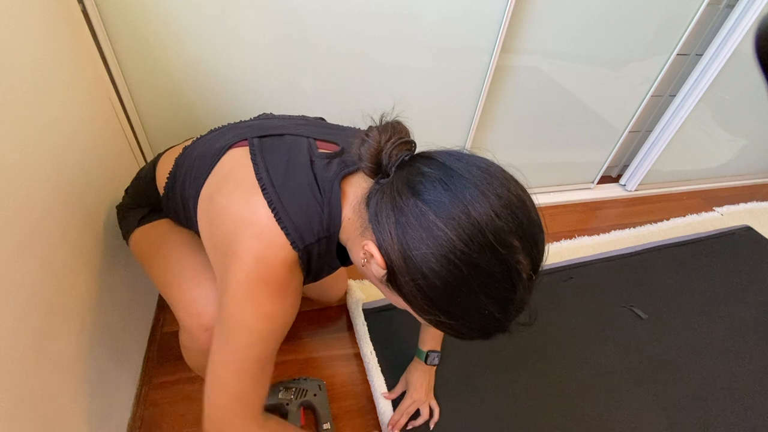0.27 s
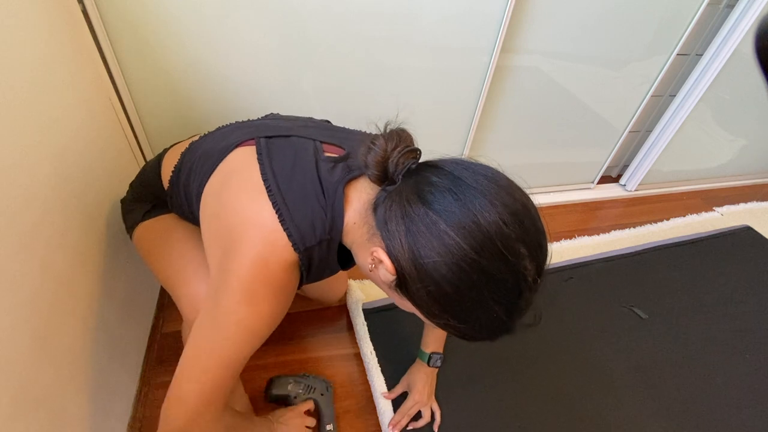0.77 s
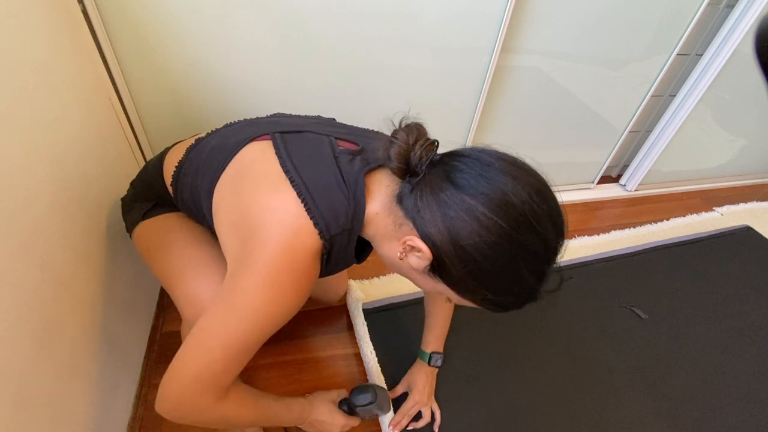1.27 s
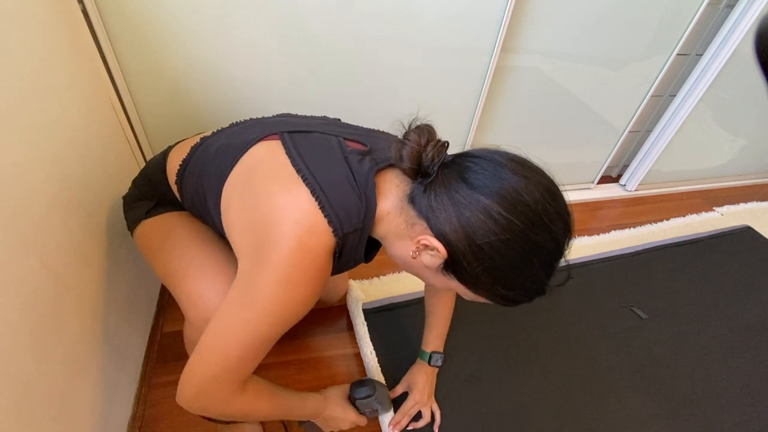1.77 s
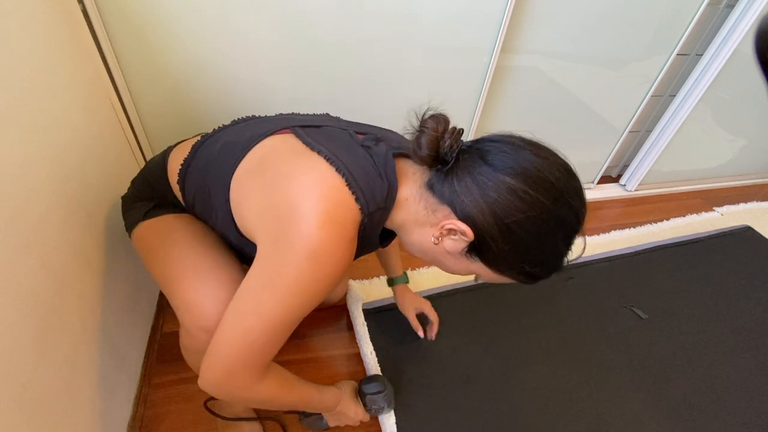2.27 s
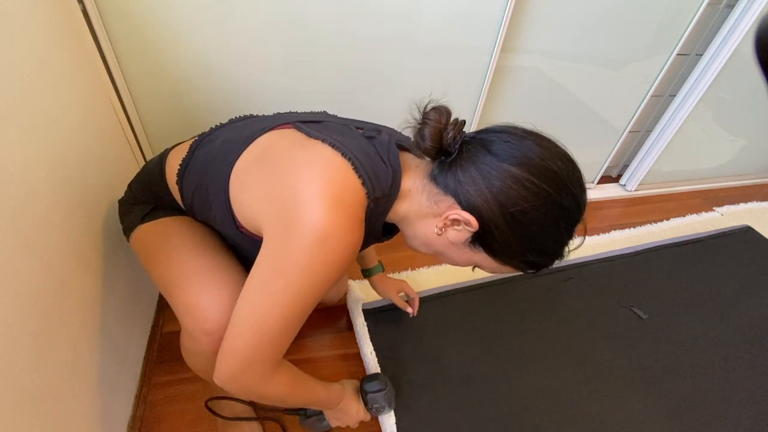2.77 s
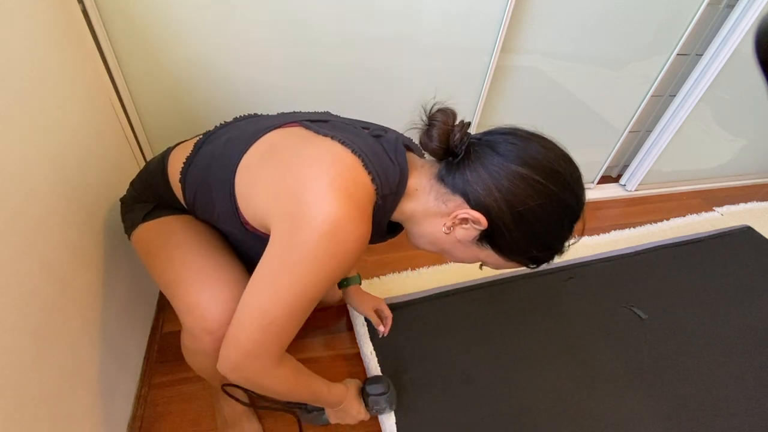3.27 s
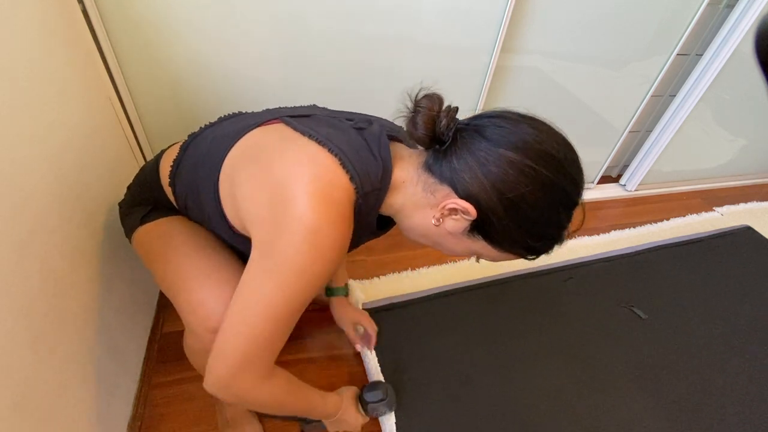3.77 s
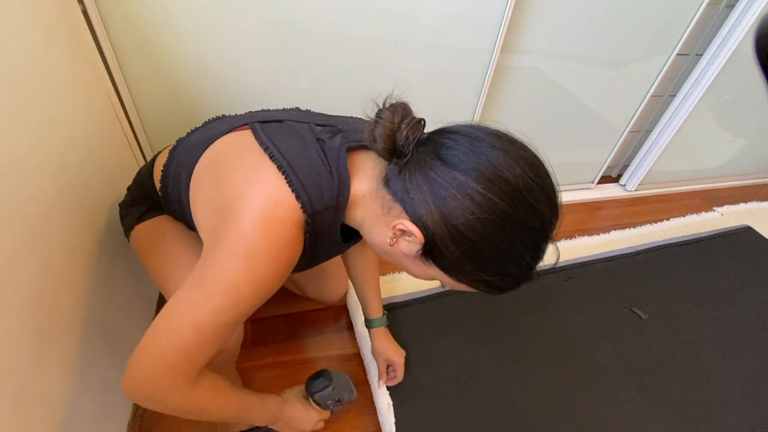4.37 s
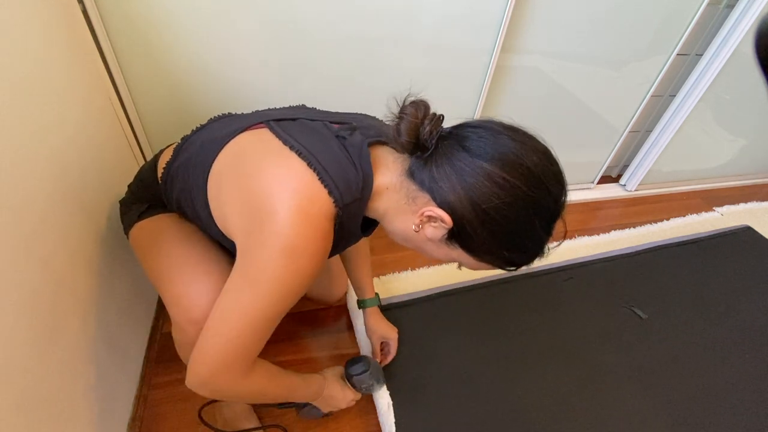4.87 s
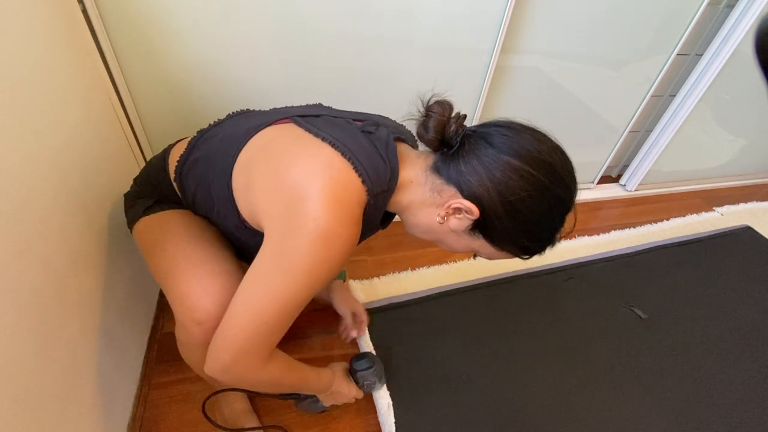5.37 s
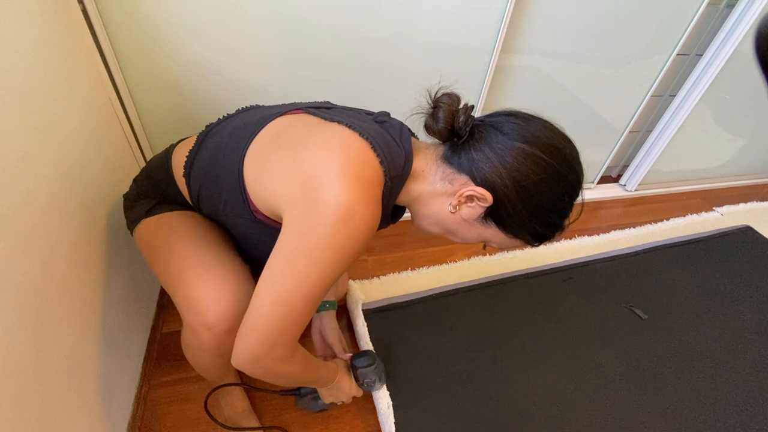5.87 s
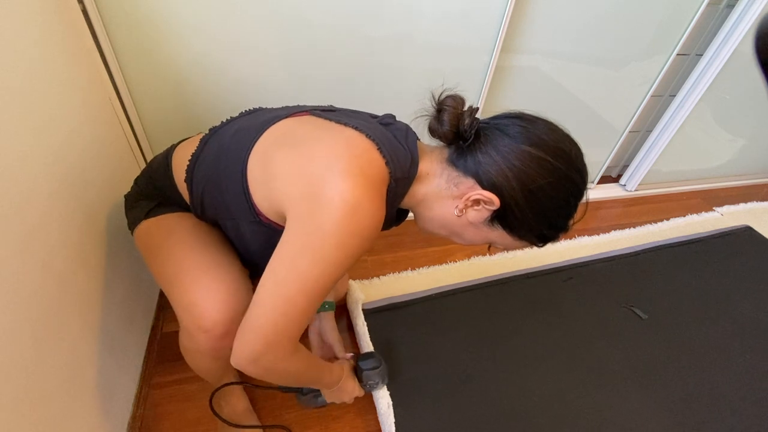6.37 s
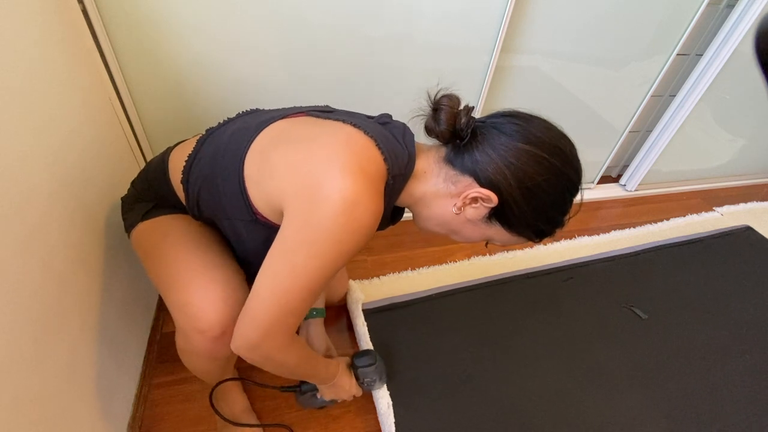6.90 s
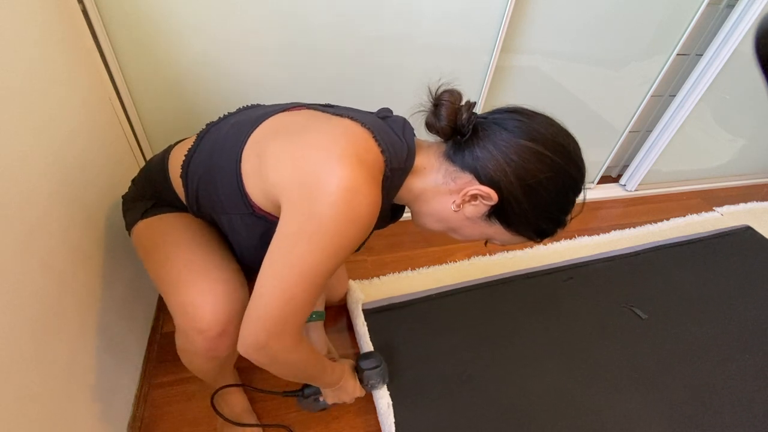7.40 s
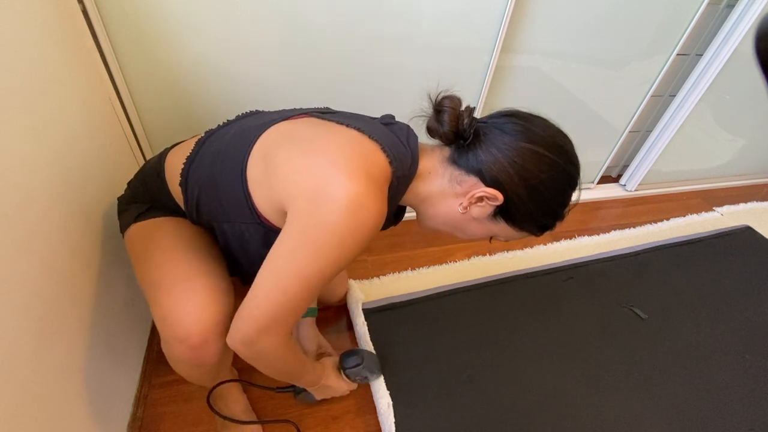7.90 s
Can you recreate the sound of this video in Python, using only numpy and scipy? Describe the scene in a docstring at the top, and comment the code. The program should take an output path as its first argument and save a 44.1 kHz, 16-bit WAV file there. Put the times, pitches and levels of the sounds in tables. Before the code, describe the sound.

Small ticks and woody bumps, a single sharp staple shot ringing through panel and floor, then more tool clicks and two tiny squeaks indoors.

```python
"""A low traffic drone, its growing wash, a growing hiss and a pulsing rasp, all shaped noise, lie under it all.
At half a second an electric staple gun ticks and knocks on a wooden floor: short blows ring modes of the boards.
Distant engines swell as gliding tones; the gun's nose, catch and magazine click against the edge of a panel.
At 3.3 s it fires once: a faint ringing noise swells for 16 ms, then a hard blow shakes panel and floor.
Clicks and soft noise rustles follow, then two falling tone squeaks after 7 s; a small hard room answers the gun."""
import sys
import numpy as np
from scipy import signal
from scipy.fft import rfft, irfft, next_fast_len
from scipy.io import wavfile

SR = 44100
rng = np.random.default_rng(int(sys.argv[2]) if len(sys.argv) > 2 else 0)


def waveform_to_disk(signal):
    """Save audio, clipped to [-1, 1], as 16-bit WAV at the path in sys.argv[1]."""
    frames = np.transpose(np.atleast_2d(signal))
    scaled = np.clip(frames, -1, 1) * 32767
    samples = np.round(scaled).astype(np.int16)
    wavfile.write(sys.argv[1], SR, samples)


N = 358974
TIME = np.arange(N) / SR

# All levels are relative: each source adds its own gain and panning. body_db and treble_db tilt a contact.
# spectrum of the drone: pitch_hz, level_db
DRONE = [(15, -53), (25, -33), (45, -8.5), (72, -16), (91, 4), (100, -4), (120, -21), (200, -43.5),
         (600, -90)]
# rise and fall of the drone: time_s, level_db
DRONE_LEVEL = [(0, -48), (2.2, -49), (3.6, -45), (4.5, -45), (5.7, -46), (6.3, -46.5), (8.1, -45)]
# stereo likeness of drone and wash, which come through the walls from the left: pitch_hz, correlation
DRONE_LIKENESS = [(30, 0.99), (88, 0.87), (130, 1), (290, 0.38), (640, 0.083)]
# spectrum of the traffic wash: pitch_hz, level_db
WASH = [(60, -40), (125, -19), (175, -22), (211, -20), (300, -24.5), (438, -28.5), (907, -29.5),
        (1800, -41.5), (2700, -41.5), (5000, -44.5), (16000, -87.5)]
# spectrum of the hiss: pitch_hz, level_db
HISS = [(1000, -24), (2600, -14), (3200, -4), (4000, -0.5), (4500, 3), (5100, 4.5), (5700, -23.5),
        (8000, -23), (12000, -16.5), (16000, -38)]
# stereo likeness of diffuse sound in the room: pitch_hz, correlation
LIKENESS = [(60, 0.82), (130, 1), (290, 1), (640, -0.22), (1400, 0.23), (3100, -0.078), (16000, 0.21)]
# swells of the rasp: crest_s, level_db
RASPS = [(0.0, -57.5), (0.58, -55.5), (1.18, -56), (1.8, -52), (2.431, -54.5), (4.35, -50), (5.0, -51.5),
         (5.631, -49), (6.22, -51), (6.83, -50.5), (7.409, -54.5), (8.06, -51)]
# spectrum of the rasp: pitch_hz, level_db
RASP = [(1500, -26), (2600, -14), (3000, -1.5), (3400, 2.5), (3700, -6.5), (4050, 3.5), (4500, -7),
        (5000, -0.5), (5800, -21), (7000, -14), (8000, -27.5), (16000, -40.5)]
# decay of the room: pitch_hz, early_t60_s, late_t60_s
ROOM = [(100.2, 0.3, 0.85), (400, 0.23, 1), (988, 0.32, 1.0), (3020, .28, 1), (7105, 0.22, 1),
        (13790, 0.3, 0.49)]
# light ticks of trigger and magazine, single or in quick pairs, as the gun is shifted:
# start_s, level_db, body_db, treble_db, ring_hz, ring_db
TICKS = [(0.5737, -37, -23, -12, 6140, -14), (0.592, -47.5, -27, -2, 4100, -3),
         (0.6286, -39, -27, -5, 3550, -17), (1.0976, -33, -35, -18.5, 3500, -16),
         (1.459, -45, -22, -25, 2050, -7), (2.239, -52.5, 6.5, -24, 2090, -15),
         (2.9164, -41, -27, -5, 4730, -15), (3.735, -29, -28, -2.5, 4420, -10),
         (3.791, -34.5, -27.5, 1.5, 2470, -8.5), (3.8112, -45.5, -24, 7, 2580, -15),
         (3.862, -32, -27, -19, 2290, -27), (4.345, -48, -2.5, -13, 1500, -15.5),
         (5.054, -49, -15, -22.5, 2380, -12), (5.4646, -41, -7, -18.5, 2380, -7.5),
         (5.5373, -40.5, -1.5, -1.5, 5230, -22), (5.7327, -40.5, -21, 5.5, 4400, -4),
         (5.7574, -34, -21, 2.5, 3000, -16), (5.7842, -44, -31, 9, 6500, -15),
         (5.933, -47, -14, -1, 7490, -25), (5.9963, -54, -20, 9.5, 3360, 7),
         (6.3698, -29.5, -8, 6.5, 3080, -14), (6.468, -53.5, -29, 11, 9800, -2),
         (6.4816, -43.5, -27, 10, 9700, -2), (6.5, -43, -33, 5.5, 5740, -3),
         (6.745, -29, -9.5, -7, 2380, -16.5), (6.7635, -37.5, 0.5, -13, 2920, -9.5),
         (7.5474, -42, -18.5, 6, 7250, -10), (7.9747, -32.5, -28, -10, 3300, -23.5)]
# the gun pressed on the panel: its nose lands, the safety catch scrapes on the way, the nose seats:
# start_s, landing_db, catch_delay_s, catch_db, travel_s, seating_db, body_db, treble_db, ring_hz, ring_db
PRESSES = [(2.345, -42.5, 0.017, -41, 0.026, -24.5, -10, -10, 3440, -17),
           (2.944, -35.5, 0.013, -31, 0.026, -16.5, -14, -8.5, 1440, -12.5),
           (3.1706, -23, 0.011, -45, 0.027, -27, -22, -4, 732, -5.5),
           (3.59, -33.5, 0.0064, -43.5, 0.018, -18, -5, -9.5, 2200, -18),
           (5.5554, -26, 0.006, -30, 0.019, -28, -8, 0.5, 5220, 3),
           (6.3292, -28, 0.01, -30, .0295, -21.5, -4, -2, 3450, -3),
           (6.805, -37.5, 0.0037, -47.5, 0.012, -23, -8, -11, 2785, -6),
           (7.44, -34, 0.0069, -27, 0.032, -22.5, -6.5, -7.5, 1217, -10)]
# broad colour of the snapping parts: pitch_hz, level_db
GUN_COLOUR = [(100, -13.5), (400, -10), (680, 1.5), (1200, -2), (2000, -3.5), (3300, -4.5), (4500, -1),
              (8000, 4.5), (12000, -4), (16000, -12.5)]
# short resonances of the hollow shell: pitch_hz, boost_db, width_hz
SHELL = [(1174, 7.5, 62), (1520, 5.5, 140), (1790, 6, 76), (2280, 5.5, 170), (2680, 5.5, 340),
         (3285, 5, 220), (4150, -0.5, 110)]
# ringing of the gun's housing: pitch_hz, level_db, t60_s
GUN_MODES = [(670, 8.5, 0.13), (730, 13, 0.14), (960, 9, 0.1), (1227, 6, 0.1), (1471, 5.5, 0.09),
             (1820, 8.5, 0.14), (2240, 2.5, 0.07), (2740, -0.5, 0.08), (3400, -0.5, .05)]
# the gun knocking on the floor boards: start_s, level_db, body_db, treble_db, ring_hz
KNOCKS = [(0.5745, -34, 5, -3, 1280), (0.5919, -41, 6.5, 3, 2320), (0.641, -31, -5, -4, 1530),
          (0.7585, -15, -16, -9, 1030), (0.7653, -18, -24, -24, 2780), (0.7705, -25, -2.5, -25, 1125),
          (0.782, -27.5, 6.5, -16, 330), (0.7921, -30, -2.5, -10, 1520), (0.8175, -27, -3.5, -11, 1144),
          (0.8245, -24.5, -1, -14, 810)]
# broad colour of the floor contacts: pitch_hz, level_db
FLOOR_COLOUR = [(60, -11), (130, -3), (380, 4.5), (600, 5), (1400, 6.5), (2800, 0), (3800, -17), (6000, -8),
                (10000, -17.5), (16000, -21)]
# ringing of the boards: pitch_hz, level_db, t60_s
FLOOR_MODES = [(213, -1, 0.39), (300, -1, 0.46), (397, 1, 0.21), (607, -3, 0.67), (729, 3, 0.47),
               (802, -2.5, 0.19), (1009, 1, 0.16), (1128, 1, 0.16), (1486, 3, 0.099), (1647, -6, 0.13),
               (2740, -8, 0.33)]
# distant engines: start_s, length_s, start_hz, end_hz, level_db, half_order_db
ENGINES = [(1.03, 0.49, 92.4, 88.8, -50, -18), (1.619, 0.53, 100.3, 95, -51.5, -21),
           (2.302, 0.73, 91.2, 90.4, -43, -26), (3.5, 0.26, 84.6, 91.3, -43.5, 1.5),
           (3.797, 0.47, 80.3, 102.3, -37.5, -12), (5.878, 1.26, 85.3, 94.2, -38, -16),
           (6.96, 1.2, 93.3, 87.45, -34.5, -30)]
# driver blow and rebounds: start_s, level_db, body_db, treble_db, ring_hz
SHOT = [(3.3168, 5, -9.5, 6.5, 5700), (3.3205, -5.5, 6, -5.5, 1560), (3.3265, -17.5, 4.5, 0.5, 2250)]
# broad colour of the shot: pitch_hz, level_db
SHOT_COLOUR = [(30, -4.5), (110, -5), (200, -5.5), (350, 2), (500, -7), (750, 8.5), (1100, 4), (1600, 7),
               (2400, 5.5), (4500, 1), (8000, 0), (11000, -3.5), (16000, -14.5)]
# ringing of the plunger: pitch_hz, level_db, t60_s
PLUNGER_MODES = [(1537, -1.5, .15), (1760, 2, .17), (3600, -4, 0.071), (3996, -2, 0.16), (4550, -6, .1),
                 (5471, -0.5, .12), (7089, -3, .13)]
# ringing of the panel: pitch_hz, level_db, t60_s
PANEL_MODES = [(222.4, -2.5, 0.89), (314, 0, 0.34), (377, 2, 0.12), (400.5, 5, 0.088), (727, 0, 0.54),
               (792, 3.5, 0.44), (950, -2.5, 0.22), (1006, 6, .22), (1380, -6.5, .14), (1400, -5, 0.28),
               (1590, 0, 0.22), (1640, -2, 0.17), (2280, -3.5, 0.26), (2330, 1, 0.2), (2770, 2.5, 0.14),
               (3070, 0.5, 0.19), (6000, -6, .22), (6800, -8.5, .2)]
# low thump of the floor under the shot: pitch_hz, level_db, t60_s
THUMP_MODES = [(48, -8, 0.24), (89.6, -1.5, 0.42), (109, 1.5, 0.29), (159, -7, 0.7)]
# hands and knees shifting: start_s, length_s, centre_hz, level_db
RUSTLES = [(4.044, 0.16, 170, -55.5), (4.333, 0.062, 1000, -57), (4.407, 0.12, 800, -58),
           (5.56, 0.14, 186, -49)]
# falling squeaks: start_s, length_s, start_hz, end_hz, level_db
SQUEAKS = [(7.218, 0.135, 3340, 1520, -57), (7.296, 0.094, 3430, 2560, -55.5)]

WASH_START_DB, WASH_DB, WASH_RISE_S = -58.5, -53, 4.1  # the wash grows, then holds
WASH_FLUTTER_DB, WASH_FLUTTER_HZ = 1.2, 14
HISS_START_DB, HISS_END_DB = -67, -63  # the hiss grows slowly
RASP_RISE_DB_PER_S, RASP_FALL_DB_PER_S = 91, 72
# reflections start out uneven in strength, then blur
ECHO_SPREAD_DB, ECHOES_PER_S, ECHO_BLUR_S = 4, 600, .1
# loose staples rattle after ticks and seatings; level and treble are offsets from the hit, body is set
RATTLE_GAP_S, RATTLE_DB, RATTLE_LOSS_DB = 0.014, -19, 5.5
RATTLE_BODY_DB, RATTLE_TREBLE_DB, RATTLE_HZ = -0.5, -12.5, 4740
NOSE_HZ, NOSE_RING_DB, CATCH_HZ, CATCH_RING_DB = 2100, -6.5, 3450, -3
LANDING_BODY_DB, LANDING_TREBLE_DB = -7.5, -8.5  # thinner and duller than the seating
CATCH_BODY_DB, CATCH_TREBLE_DB = 1, -3  # a little fuller and duller than the seating
REDRAW_S, MODE_DETUNE, MODE_SPREAD_DB = .35, .012, 3  # housing modes are redrawn slightly at each step
# the boards answer each knock with thuds, the second one stronger
THUD_GAP_S, THUD_DB, THUD_LOSS_DB = .009, -17.5, -1.5
THUD_BODY_DB, THUD_TREBLE_DB, THUD_HZ = 8.5, 6, 1120
SHOT_GRIT, PRESS_GRIT, KNOCK_GRIT = .25, .45, .35  # gain of random grit added to a blow
CUTOFF_HZ = 16000


def from_db(db):
    """Decibels to gain."""
    return np.exp(np.asarray(db) * np.log(10) / 20)


def at_hz(points, hz, axis=1):
    """Read a table column along log frequency."""
    points = np.array(points, float)
    return np.interp(np.log(np.maximum(hz, 1)), np.log(points[:, 0]), points[:, axis])


def unit_energy(x):
    """Scale each channel to energy 1."""
    return x / np.sqrt(np.sum(x ** 2, axis=-1, keepdims=True) + 1e-20)


def band(x, hz, kind, order=2):
    """Butterworth filter."""
    sos = signal.butter(order, np.clip(hz, 10, .45 * SR), kind, fs=SR, output="sos")
    return signal.sosfilt(sos, x)


def convolve(x, response):
    """Pass a sound through a mono or stereo response."""
    return signal.fftconvolve(np.atleast_2d(x), np.atleast_2d(response), axes=-1)[:, :N]


def pan(left_db):
    """Left and right gains for a level difference."""
    return from_db(np.array([[left_db], [-left_db]]) / 2)


def waver(rate_hz):
    """Random motion between rate_hz new values a second, with a spread of about 1."""
    steps = rng.standard_normal(N // 20)
    return 1.2 * np.interp(TIME * rate_hz, np.arange(len(steps)), steps)


def steady_noise(spectrum, likeness, lag_s=0):
    """Stereo noise with a set likeness at each frequency, later on the right by lag_s; left rms 1."""
    size = next_fast_len(N)
    hz = np.fft.rfftfreq(size, 1 / SR)
    alike = np.clip(at_hz(likeness, hz), -1, 1)
    mid, side = rfft(rng.standard_normal((2, size))) * from_db(at_hz(spectrum, hz))
    stereo = np.sqrt(1 + alike) * mid + np.sqrt(1 - alike) * side * [[1], [-1]]
    left, right = irfft(stereo)[:, :N]
    return np.array([left, np.roll(right, int(lag_s * SR))]) / left.std()


def background():
    """A low drone of distant traffic, its restless wash and a slowly growing hiss, all shaped noise."""
    drone_gain = from_db(np.interp(TIME, *np.transpose(DRONE_LEVEL)))
    drone = drone_gain * steady_noise(DRONE, DRONE_LIKENESS, lag_s=0.00063)
    wash_db = np.interp(TIME, [0, WASH_RISE_S], [WASH_START_DB, WASH_DB])
    wash_db = wash_db + WASH_FLUTTER_DB * waver(WASH_FLUTTER_HZ)
    wash = from_db(wash_db) * steady_noise(WASH, DRONE_LIKENESS, lag_s=0.00063)
    hiss = from_db(np.linspace(HISS_START_DB, HISS_END_DB, N)) * steady_noise(HISS, LIKENESS)
    return pan(4.3) * (drone + wash + hiss)


def rasps():
    """A rasp like a distant cicada: noise climbs evenly in dB to each crest and dies away again."""
    swell = 0
    for crest_s, level_db in RASPS:
        climb_db = RASP_RISE_DB_PER_S * (crest_s - TIME)
        fall_db = RASP_FALL_DB_PER_S * (TIME - crest_s)
        swell = swell + from_db(level_db - np.maximum(climb_db, fall_db))
    return pan(4.0) * from_db(0.5) * swell * steady_noise(RASP, LIKENESS)


def crack(colour, size=4096):
    """Minimum-phase pulse: the most compact causal one with the given spectrum."""
    cepstrum = irfft(np.log(from_db(at_hz(colour, np.fft.rfftfreq(size, 1 / SR)))))
    cepstrum[1:size // 2] *= 2
    cepstrum[size // 2 + 1:] = 0
    return irfft(np.exp(rfft(cepstrum)))


def ringing(modes, rise_s=0.0053, apart_hz=700):
    """Standing waves of a struck body, out of step at the two microphones; a mode's dB is its energy."""
    t, out = TIME[:SR // 2], 0
    for k, (hz, db, t60) in enumerate(modes):
        # the low modes stay nearly in step
        phase = rng.uniform(-1, 1) * min(hz / apart_hz, 1) * np.array([[1], [-1]])
        envelope = from_db(-60 * t / t60) * (1 - np.exp(-t / rise_s))
        wave = np.sin(2 * np.pi * hz * t + phase) * envelope
        out = out + (-1) ** k * from_db(db) * unit_energy(wave)
    return unit_energy(out)


def chatter(length_s, bounce=0.57, count=7, size=2048):
    """A blow scattered into tiny rebounds by a chain of allpass echoes; its spectrum stays flat."""
    hz = np.fft.rfftfreq(size, 1 / SR)
    shares = rng.uniform(.2, 1, (count, 1))
    delay = np.exp(-2j * np.pi * hz * length_s * shares / shares.sum())
    bounce = np.clip(bounce, 0, .8)
    return irfft(np.prod((bounce + delay) / (1 + bounce * delay), axis=0))


def contacts(rows, chatter_s, grit, part_db, part_t60, body_hz=1000, treble_hz=5000, size=4096):
    """Force of each touch: gritty chatter with its own weight and hardness, which rings the touched part."""
    force, t = np.zeros(N + size), TIME[:size]
    for s, level_db, body_db, treble_db, ring_hz in rows:
        grains = unit_energy(rng.standard_normal(size) ** 3 * np.exp(-t / chatter_s))
        blow = unit_energy(chatter(chatter_s, size=size) + grit * grains)
        # two shelves, each with a common offset
        colour = [(body_hz / 1.4, body_db + 5), (body_hz * 1.4, 0),
                  (treble_hz / 1.4, 0), (treble_hz * 1.4, treble_db - 2)]
        touch = signal.fftconvolve(blow, crack(colour))[:size]
        tone = np.sin(2 * np.pi * ring_hz * t) * from_db(-60 * t / part_t60)
        part = unit_energy(signal.fftconvolve(blow, tone)[:size])
        start = int(s * SR)
        force[start:start + size] += from_db(level_db) * (touch + from_db(part_db) * part)
    return force[:N]


def bounces(hits, gap_s, first_db, loss_db, body_db, brighter_db, ring_hz, count=2):
    """An uneven run of small touches after each hit."""
    uneven = rng.uniform(.8, 1.2, (len(hits), count))
    touches = []
    for (s, level_db, _, treble_db, _), spread in zip(hits, uneven):
        for k in range(count):
            touch_s = s + gap_s * (k + 1) * spread[k]
            touch_db = level_db + first_db - loss_db * k
            touches.append((touch_s, touch_db, body_db, treble_db + brighter_db, ring_hz))
    return touches


def rattled(hits):
    """Hits with the rattle of staples that follows each."""
    return hits + bounces(hits, RATTLE_GAP_S, RATTLE_DB, RATTLE_LOSS_DB,
                          RATTLE_BODY_DB, RATTLE_TREBLE_DB, RATTLE_HZ)


def pings(rows, t60):
    """Brief decaying sine tones of small parts that ring out when touched."""
    out, t = np.zeros(N), TIME[:SR // 20]
    for s, level_db, ring_hz in rows:
        tone = unit_energy(np.sin(2 * np.pi * ring_hz * t) * from_db(-60 * t / t60))
        out[int(s * SR):int(s * SR) + len(t)] += from_db(level_db) * tone
    return out


def room(wet_db, late_db, lag_s, dull_db=0):
    """Direct sound, dense corner reflections and a weaker long tail from beyond; walls dull the top octaves."""
    t, edges = TIME[:SR], 45 * 2 ** np.arange(0, 9, .5)  # half-octave bands
    echoes = from_db(ECHO_SPREAD_DB * waver(ECHOES_PER_S)[:SR] * np.exp(-t / ECHO_BLUR_S))
    white, tail = rng.standard_normal((2, 2, SR)) * echoes, 0
    for k, (low, high) in enumerate(zip(edges, edges[1:])):
        hz = np.sqrt(low * high)
        alike = np.clip(at_hz(LIKENESS, hz), -1, 1)
        mid, side = band(white[k % 2], [low, high], "band")
        noise = np.sqrt(1 + alike) * mid + np.sqrt(1 - alike) * side * [[1], [-1]]
        early = from_db(-60 * t / at_hz(ROOM, hz))
        late = from_db(late_db - 60 * t / at_hz(ROOM, hz, axis=2))
        onset = 1 - np.exp(-t / 0.00028)
        loss = from_db(-dull_db * max(np.log2(hz / 4000), 0))  # dull_db per octave above 4 kHz
        share = np.sqrt(2 * (high - low) / SR)  # energy in proportion to bandwidth
        tail = tail + loss * unit_energy(noise * (early + late) * onset) * share
    response = from_db(wet_db) * tail
    response[0, 0] += 1
    response[1, int(abs(lag_s) * SR)] += 1  # direct sound is later on the right
    return response


def ticks():
    """Light, crisp touches, single or in quick pairs, in which the small part itself rings out."""
    hits = [row[:5] for row in TICKS]
    rings = [(s, level_db + ping_db, ring_hz) for s, level_db, _, _, ring_hz, ping_db in TICKS]
    force = contacts(rattled(hits), chatter_s=0.0013, grit=0.67, part_db=-24.0, part_t60=.007)
    return force + pings(rings, t60=.013)


def presses():
    """Nose landing, catch scrape and a seating that shakes the staples; nose, catch and seat each ring."""
    approach, seatings, rings = [], [], []
    for (s, landing_db, catch_delay_s, catch_db, travel_s, seating_db,
         body_db, treble_db, ring_hz, ring_db) in PRESSES:
        catch_s, seat_s = s + catch_delay_s, s + travel_s
        approach.append((s, landing_db, body_db + LANDING_BODY_DB, treble_db + LANDING_TREBLE_DB, NOSE_HZ))
        approach.append((catch_s, catch_db, body_db + CATCH_BODY_DB, treble_db + CATCH_TREBLE_DB, CATCH_HZ))
        seatings.append((seat_s, seating_db, body_db, treble_db, ring_hz))
        rings.append((s, landing_db + NOSE_RING_DB, NOSE_HZ))
        rings.append((catch_s, catch_db + CATCH_RING_DB, CATCH_HZ))
        rings.append((seat_s, seating_db + ring_db, ring_hz))
    hits = approach + rattled(seatings)
    force = contacts(hits, chatter_s=.0019, grit=PRESS_GRIT, part_db=-29.5, part_t60=0.013)
    return force + from_db(-7) * pings(rings, t60=0.0076)


def shell(x):
    """The hollow shell colours every snap with its short resonances."""
    for hz, boost_db, width_hz in SHELL:
        peak = signal.lfilter(*signal.iirpeak(hz, hz / width_hz, fs=SR), x)
        x = x + (from_db(boost_db) - 1) * peak
    return x


def housing(force):
    """The gun's body rings with modes whose pitch and level are redrawn slightly every REDRAW_S."""
    out, step = np.zeros((2, N + SR)), int(REDRAW_S * SR)
    for start in range(0, N, step):
        shifts = rng.standard_normal((len(GUN_MODES), 2))
        modes = [(hz * np.exp(MODE_DETUNE * a), db + MODE_SPREAD_DB * b, t60)
                 for (hz, db, t60), (a, b) in zip(GUN_MODES, shifts)]
        ring = signal.fftconvolve(force[None, start:start + step], ringing(modes), axes=-1)
        out[:, start:start + ring.shape[1]] += ring
    return out[:, :N]


def handling():
    """Small parts snap against plastic housing and steel magazine; light ticks leave less late tail."""
    pressed, ticked = presses(), ticks()
    snap = unit_energy(shell(crack(GUN_COLOUR)))
    heavy_room = room(wet_db=1.0, late_db=-31, lag_s=.00008, dull_db=4.0)
    heavy = convolve(convolve(pressed, snap), heavy_room)
    light_room = room(wet_db=1.5, late_db=-35.5, lag_s=.00008, dull_db=4.5)
    light = convolve(convolve(ticked, snap), light_room)
    body = from_db(-8.0) * housing(pressed + from_db(-1) * ticked)
    return from_db(25.0) * pan(3.4) * (heavy + light + body)


def knocks():
    """The heavy gun bumps the floor boards with a short woody clack; the boards ring on."""
    thuds = bounces(KNOCKS, THUD_GAP_S, THUD_DB, THUD_LOSS_DB, THUD_BODY_DB, THUD_TREBLE_DB, THUD_HZ)
    force = contacts(KNOCKS + thuds, chatter_s=0.002, grit=KNOCK_GRIT, part_db=-23, part_t60=0.014)
    rings = [(s, level_db, ring_hz) for s, level_db, _, _, ring_hz in KNOCKS]
    woody = from_db(-3.0) * pings(rings, t60=0.027)
    clack = convolve(force, unit_energy(crack(FLOOR_COLOUR))) + woody
    clack = convolve(clack, room(wet_db=1.0, late_db=-41, lag_s=0.00026))
    boards = from_db(-4.5) * convolve(force, ringing(FLOOR_MODES, rise_s=0.0026))
    return from_db(19.0) * pan(3.7) * (clack + boards)


def engines(swell=0.27, flattening=1.505):
    """Only the firing tone and its half order get through the walls; speed levels off near its top."""
    out = np.zeros(N)
    for s, length, start_hz, end_hz, level_db, half_order_db in ENGINES:
        heard = (TIME > s) & (TIME < s + length)
        along = (TIME[heard] - s) / length
        from_top = along if start_hz > end_hz else 1 - along
        hz = max(start_hz, end_hz) - abs(end_hz - start_hz) * from_top ** flattening
        phase = 2 * np.pi * np.cumsum(hz) / SR
        tone = np.sin(phase) + from_db(half_order_db) * np.sin(phase / 2)
        out[heard] += from_db(level_db) * np.sin(np.pi * along) ** swell * tone
    return np.sqrt(2) * pan(3.3) * out


def shot(lead_s=.016, lead_db=-17, early_ring_db=0, plunger_db=7, ring_db=13, thump_db=15.0):
    """A faint ringing noise swells for lead_s, then the driver's hard blow shakes panel and floor."""
    blow_s = SHOT[0][0]
    until, colour = blow_s - TIME, unit_energy(crack(SHOT_COLOUR))
    lead_swell = np.clip(1 - until / lead_s, 0, 1) * (until > 0)
    lead_noise = lead_swell * band(rng.standard_normal(N), [1200, 7000], "band")
    forces = []
    for hit in SHOT:
        force = contacts([hit], chatter_s=0.0028, grit=SHOT_GRIT, part_db=-30.0, part_t60=0.02)
        forces.append(from_db(17.5) * force)
    forces.append(from_db(lead_db) * lead_noise)
    # each force gets its own random room response, for a smoother tail
    bang = 0
    for force in forces:
        reflections = room(wet_db=4.0, late_db=-25.5, lag_s=.0001, dull_db=3.5)
        bang = bang + convolve(convolve(force, colour), reflections)
    blow = signal.unit_impulse(N, int(blow_s * SR))
    lead_start = signal.unit_impulse(N, int((blow_s - lead_s) * SR))
    struck = convolve(from_db(plunger_db) * blow, ringing(PLUNGER_MODES))
    early_modes = ringing(PLUNGER_MODES, rise_s=0.013)
    early_ring = convolve(from_db(plunger_db + early_ring_db) * lead_start, early_modes)
    panel = from_db(ring_db) * convolve(blow, ringing(PANEL_MODES, apart_hz=450))
    floor = from_db(thump_db) * convolve(blow, ringing(THUMP_MODES, rise_s=0.0035, apart_hz=170))
    return pan(2.2) * (bang + panel + struck + early_ring) + floor


def rustles(rough_db=4, grain_hz=110):
    """Hands and knees rub on fabric and floor: short uneven strokes of band noise."""
    out, grain = np.zeros((2, N)), from_db(rough_db * waver(grain_hz))
    for s, length, centre_hz, level_db in RUSTLES:
        heard = (TIME > s) & (TIME < s + length)
        noise = rng.standard_normal((3, heard.sum()))
        shared, left, right = band(noise, [centre_hz / 1.6, centre_hz * 1.6], "band")
        rub = shared + .5 * np.array([left, right])
        stroke = np.sin(np.pi * (TIME[heard] - s) / length) * grain[heard]
        out[:, heard] += from_db(level_db) * stroke * rub / rub.std()
    return pan(2.7) * out


def squeaks(waver_hz=130, rough=0.55, flattening=.68, jitter_hz=85):
    """Thin unsteady tones that tip over, slide down and flatten out; each is strongest early on."""
    out, jitter = np.zeros(N), jitter_hz * waver(waver_hz)
    for s, length, start_hz, end_hz, level_db in SQUEAKS:
        along = np.clip((TIME - s) / length, 0, 1) ** flattening
        hz = end_hz + (start_hz - end_hz) * np.cos(np.pi / 2 * along) ** 2
        strength = np.sqrt(np.abs(np.sin(np.pi * along)))
        out += from_db(level_db) * strength * np.sin(2 * np.pi * np.cumsum(hz + jitter) / SR)
    return out * (1 + rough * waver(waver_hz))


def scene():
    """All sources at the two microphones."""
    gun = handling() + knocks() + shot()
    return gun + rustles() + engines() + squeaks() + rasps() + background()


def record(dry, port_hz=7200, right_bright=0.3):
    """The right microphone is the brighter one; strong peaks overload the input; the top is cut."""
    sound = dry + right_bright * band(dry, [port_hz, 2 * port_hz], "band") * [[-1], [1]]
    clipped = sound / (1 + sound ** 8) ** (1 / 8)
    return signal.sosfilt(signal.ellip(10, .2, 70, CUTOFF_HZ, fs=SR, output="sos"), clipped)


dry = scene()
out = record(dry)
waveform_to_disk(out)
```